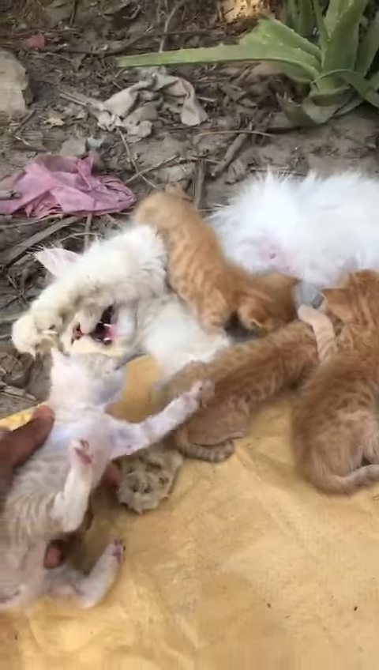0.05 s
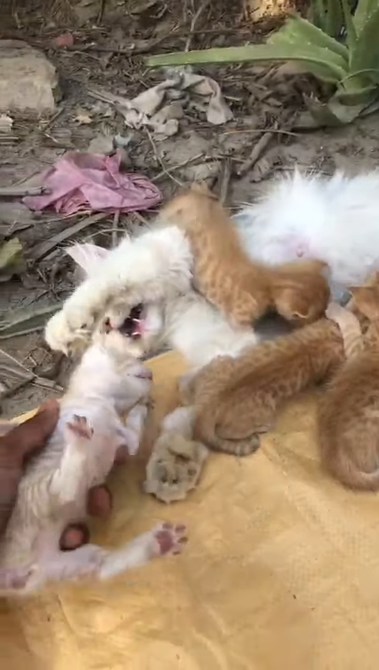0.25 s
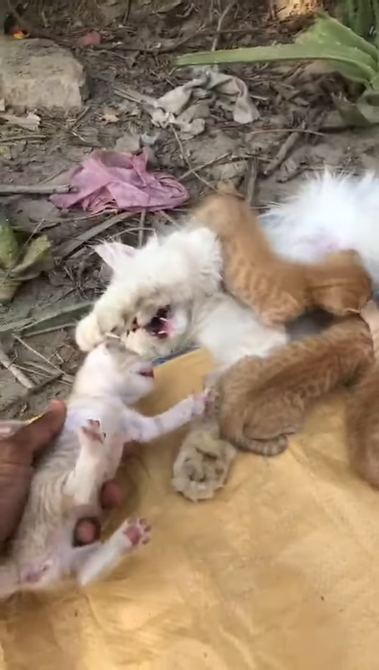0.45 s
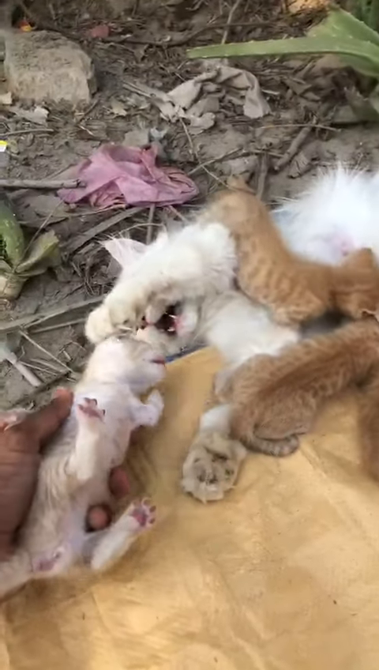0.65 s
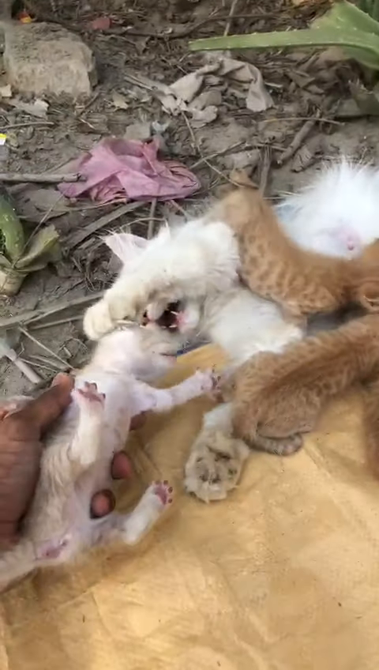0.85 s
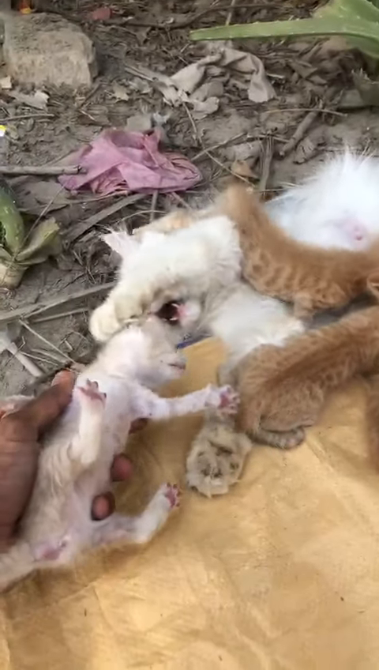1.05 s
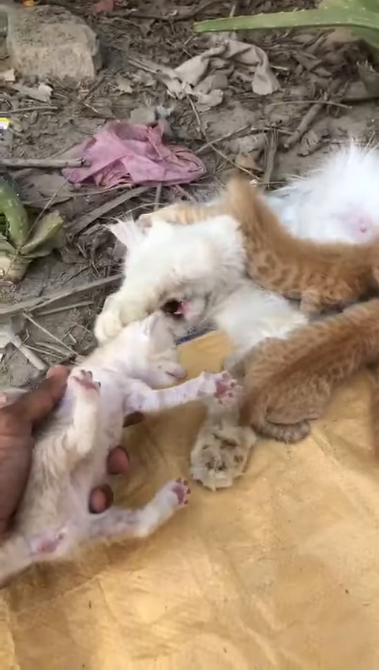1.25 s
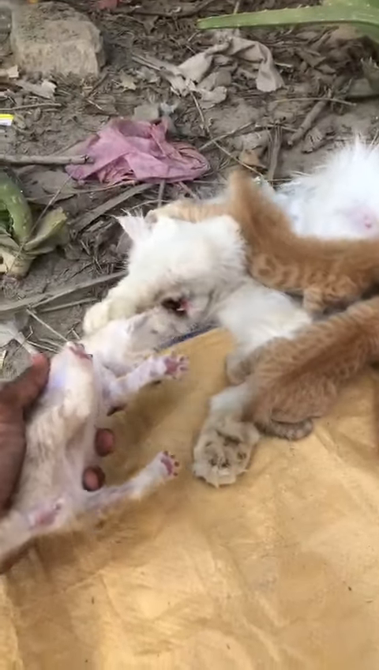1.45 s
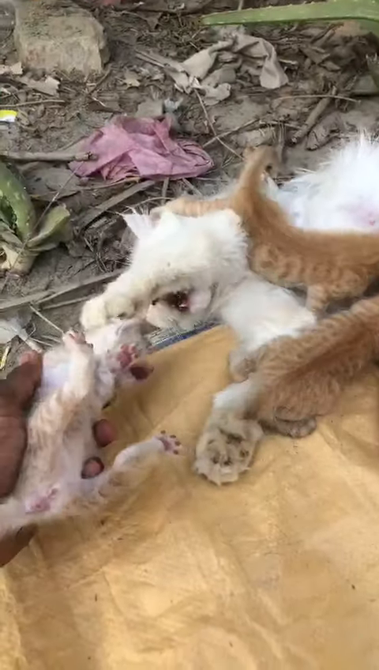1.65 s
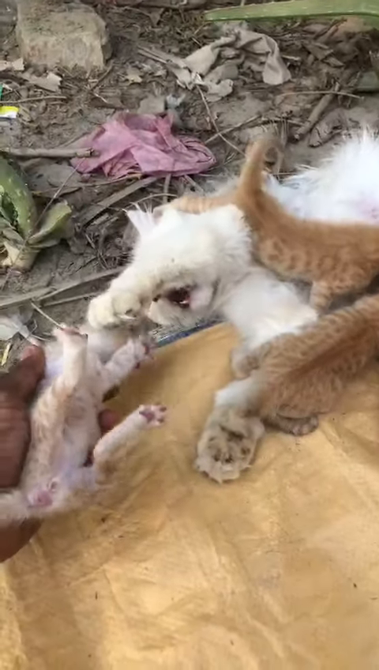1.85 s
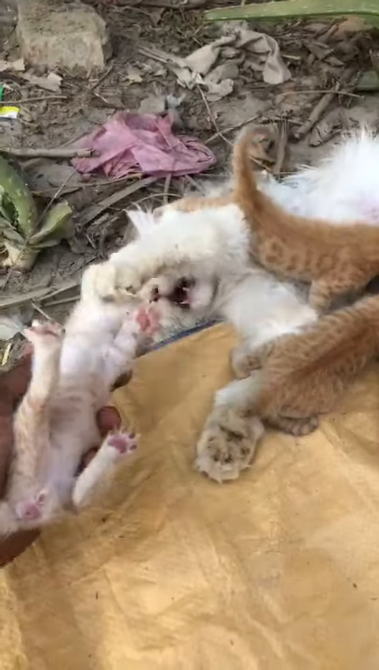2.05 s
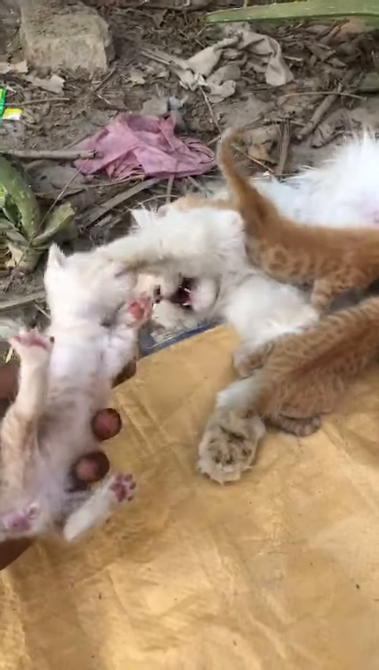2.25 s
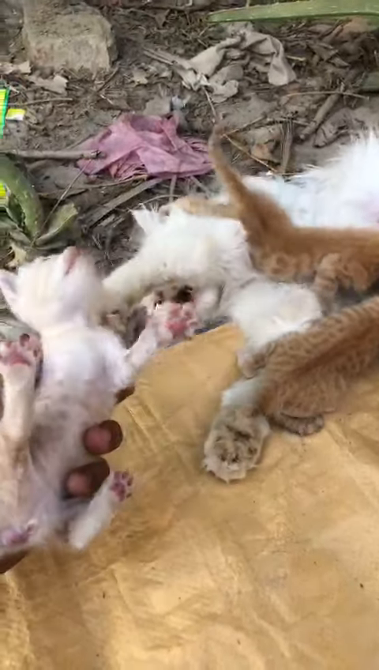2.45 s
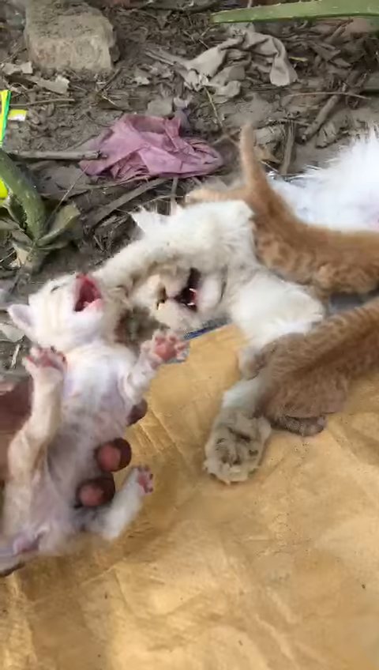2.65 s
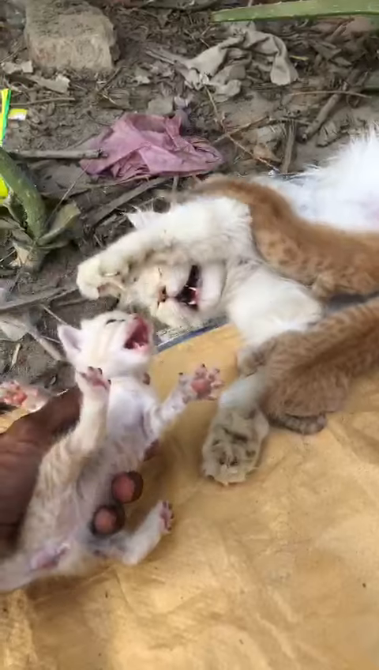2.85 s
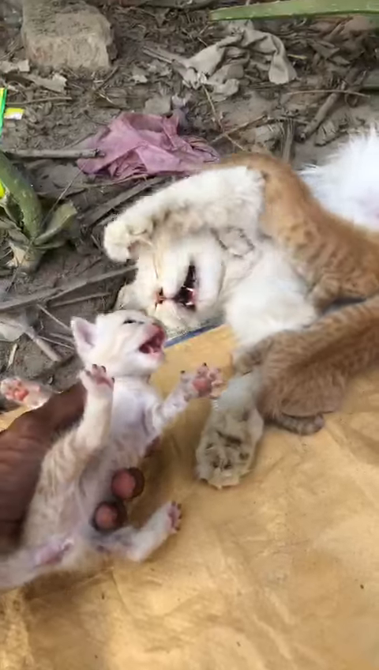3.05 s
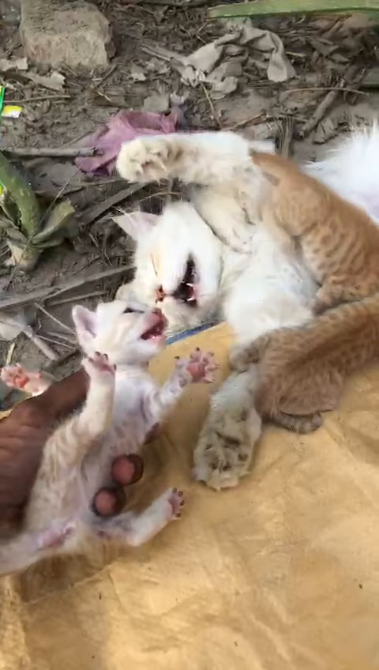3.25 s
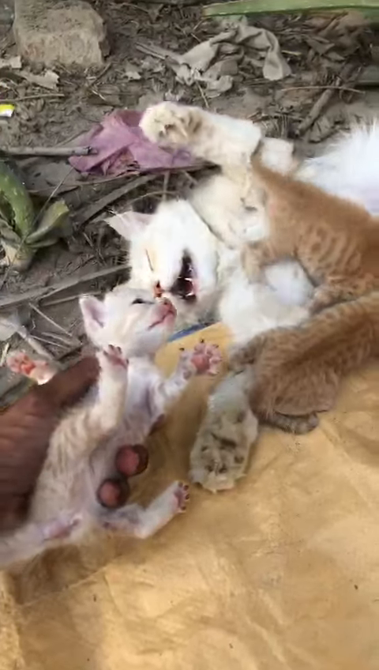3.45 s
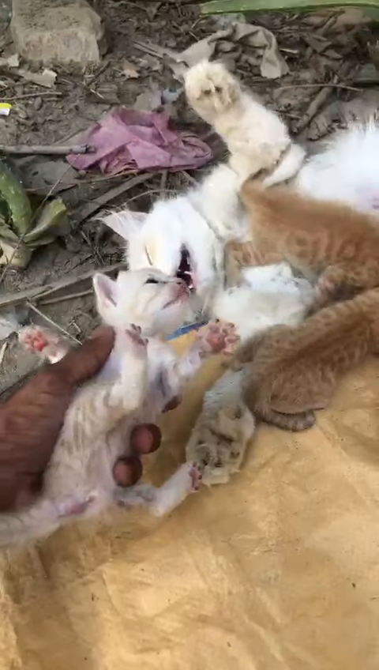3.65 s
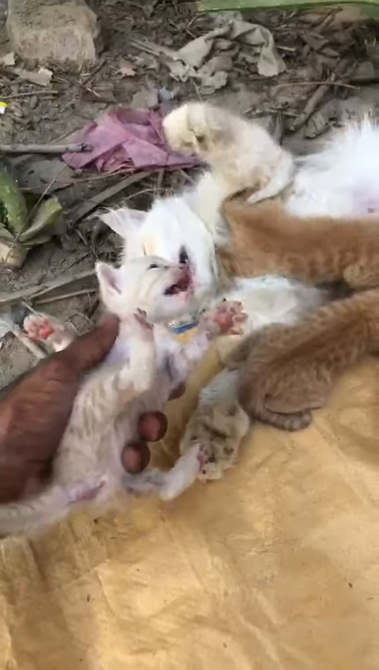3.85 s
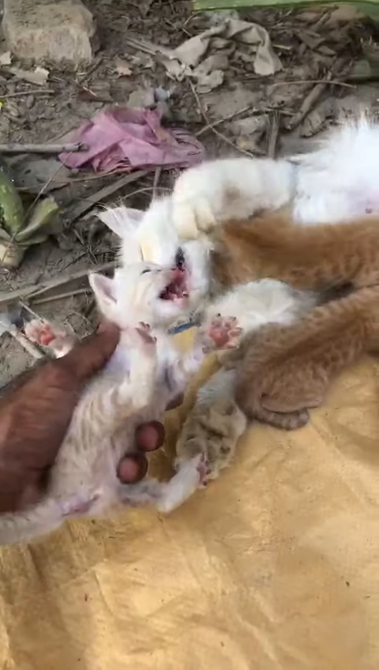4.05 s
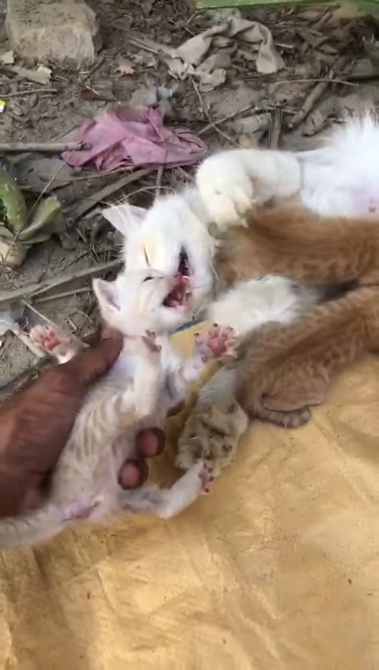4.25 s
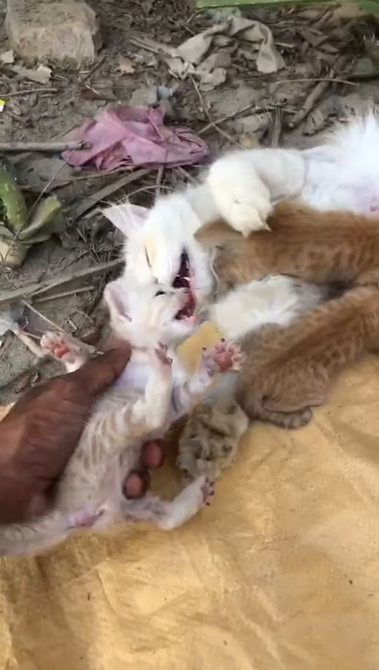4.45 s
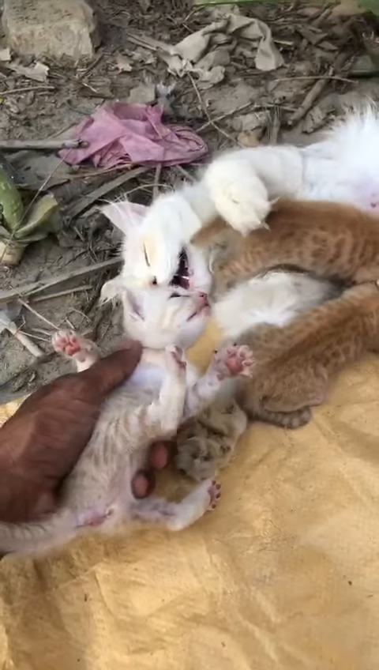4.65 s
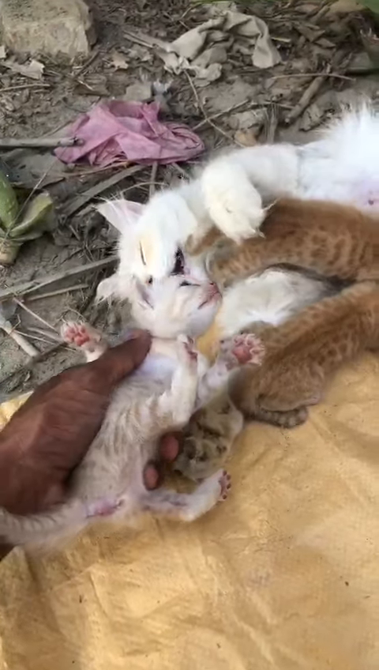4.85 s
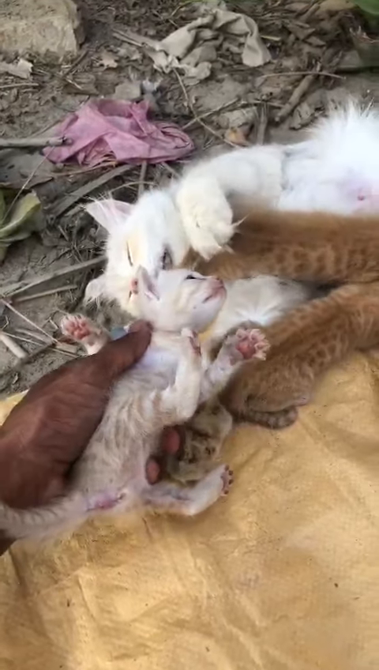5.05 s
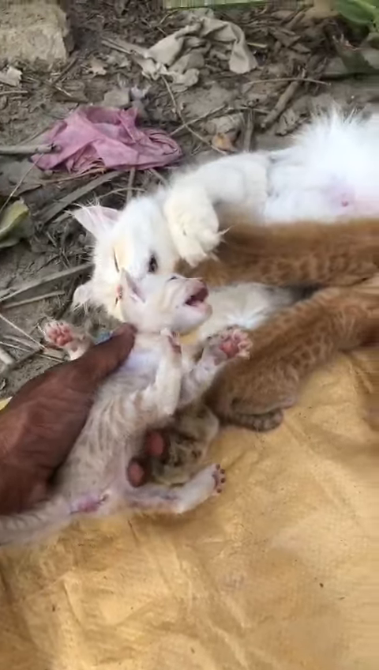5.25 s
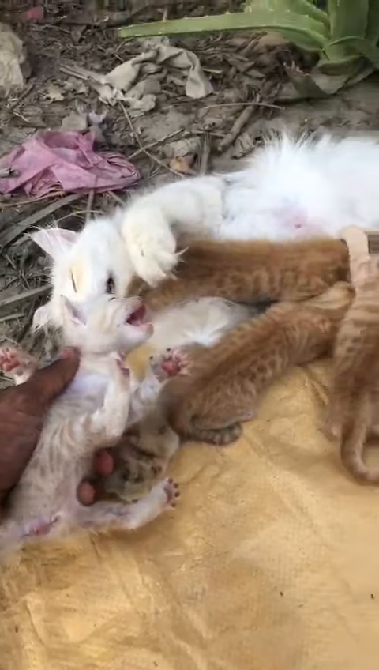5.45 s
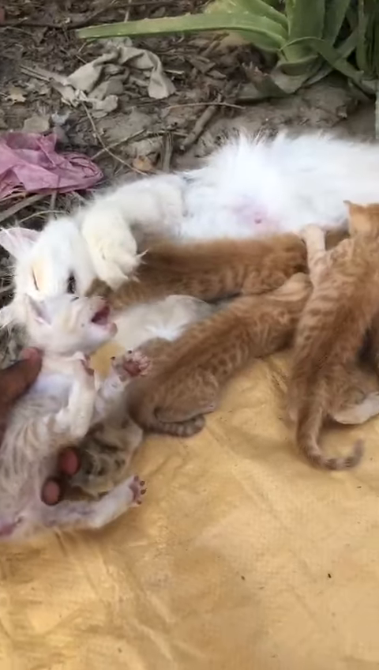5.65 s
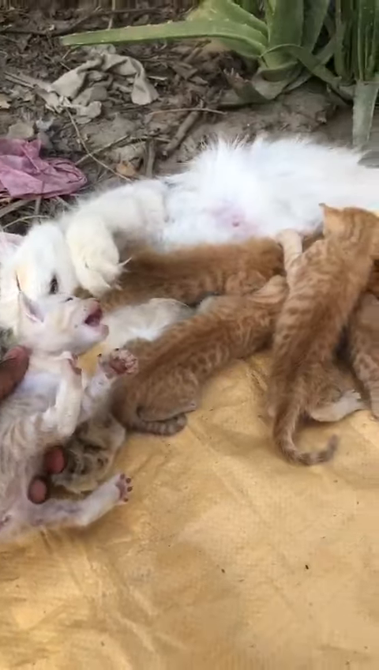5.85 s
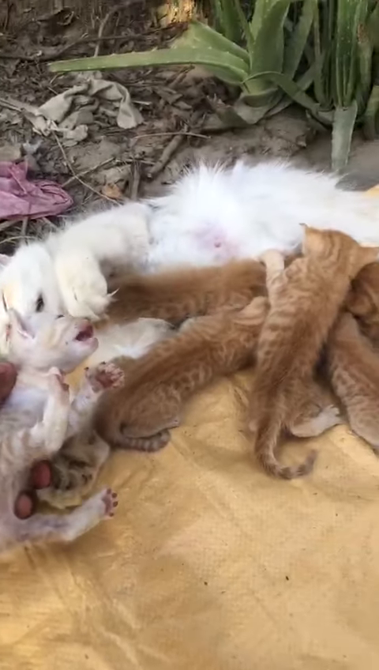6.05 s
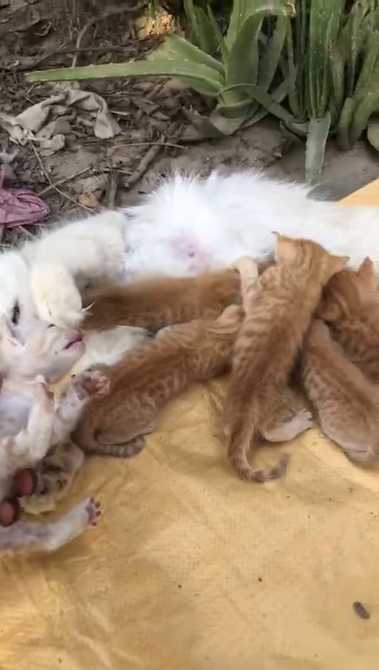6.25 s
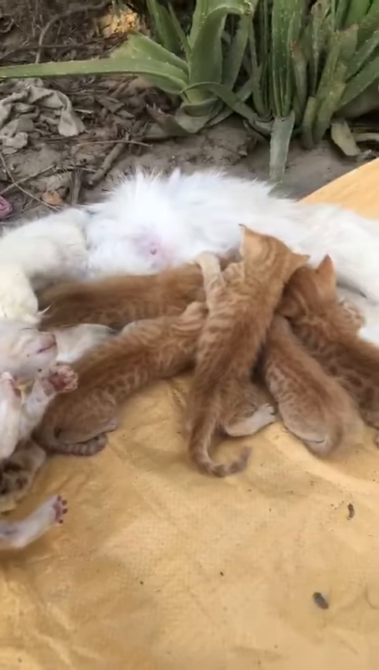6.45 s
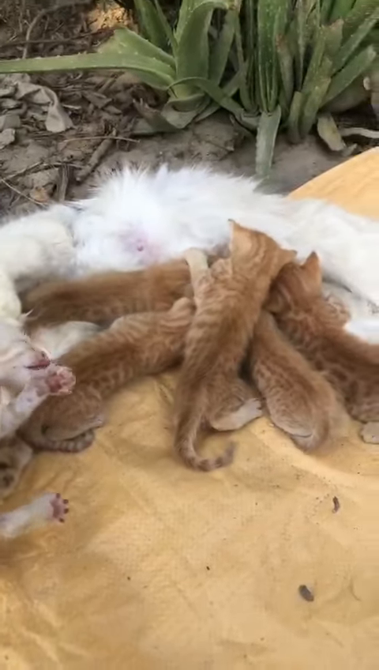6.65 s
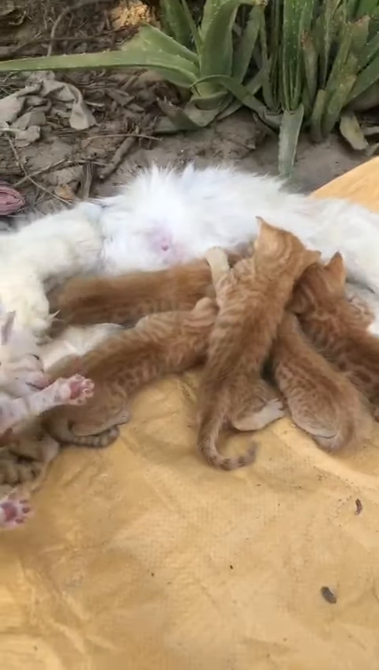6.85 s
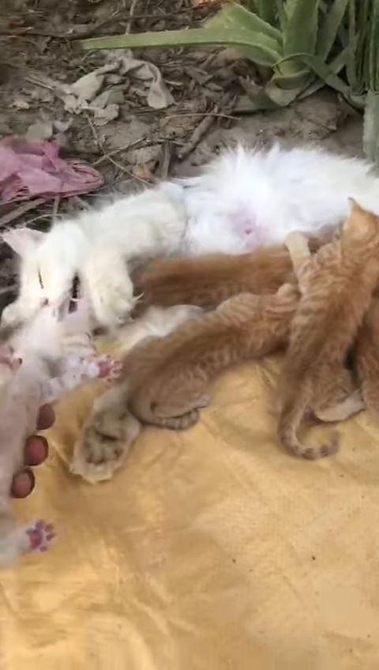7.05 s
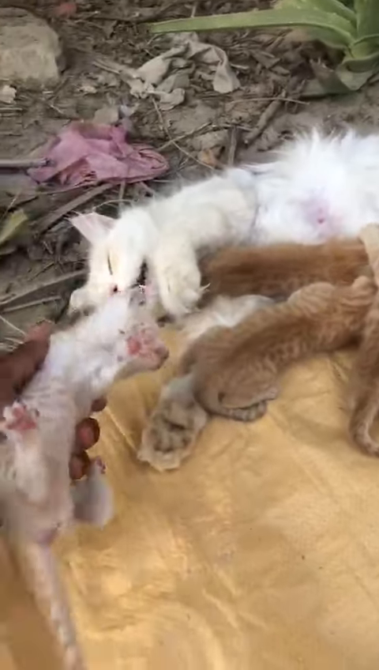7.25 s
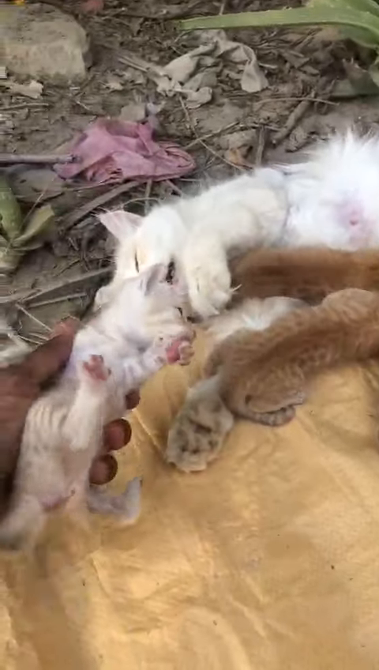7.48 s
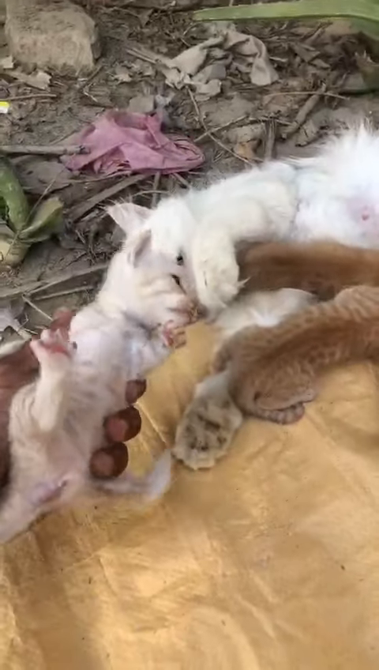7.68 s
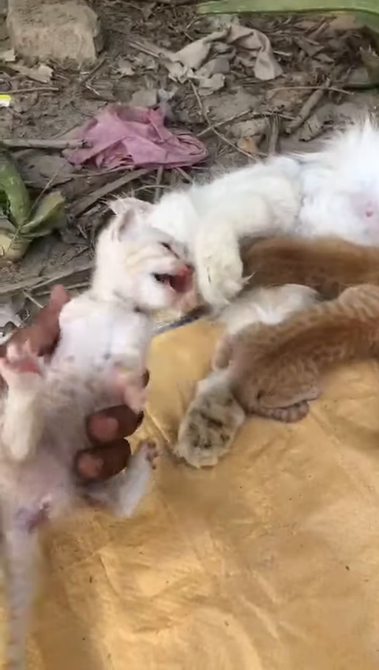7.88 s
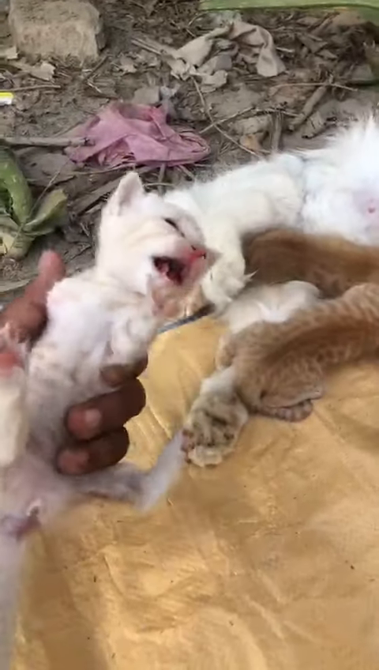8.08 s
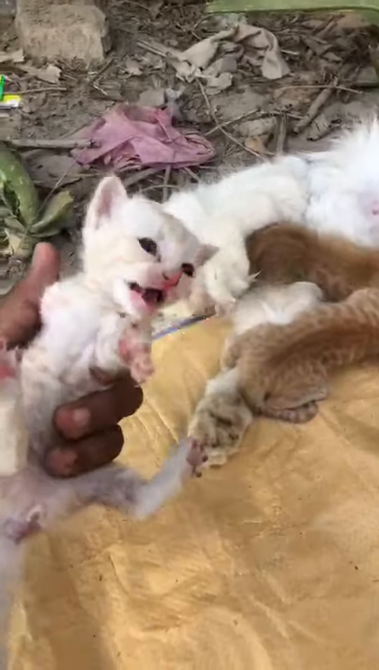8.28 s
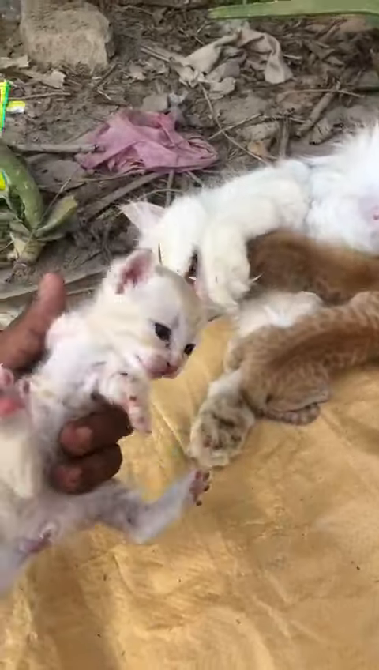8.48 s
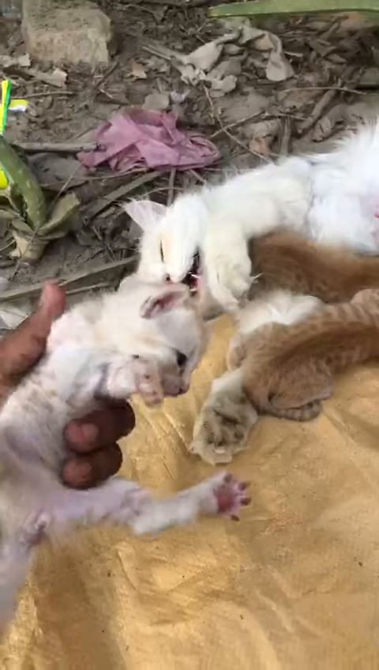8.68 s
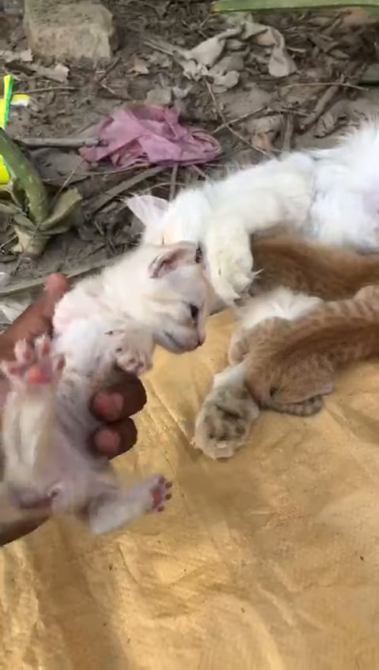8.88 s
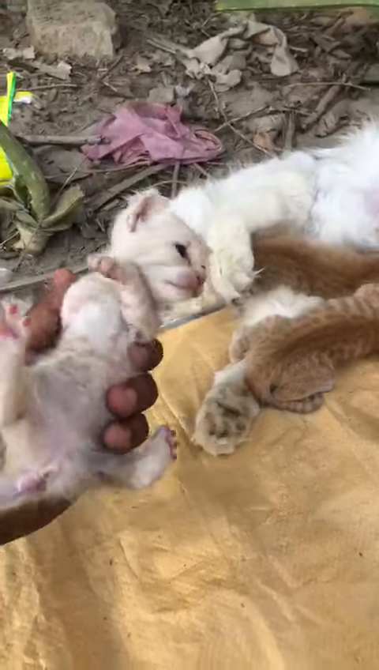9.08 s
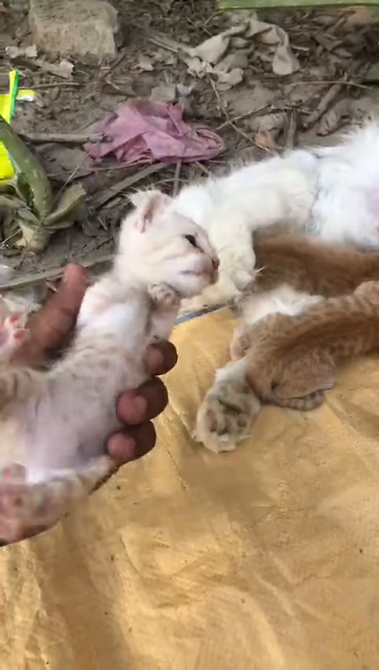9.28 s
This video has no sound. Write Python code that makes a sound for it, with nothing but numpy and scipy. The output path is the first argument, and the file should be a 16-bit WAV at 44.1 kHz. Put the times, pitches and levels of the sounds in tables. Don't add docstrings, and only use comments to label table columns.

```python
import sys
import numpy as np
from scipy import signal
from scipy.fft import rfft, irfft
from scipy.io import wavfile
from scipy.ndimage import uniform_filter1d

SR = 44100
rng = np.random.default_rng(int(sys.argv[2]) if len(sys.argv) > 2 else 0)


def inscribe(sig):
    pcm = np.round(np.clip(np.atleast_2d(sig).T, -1, 1) * 32767)
    wavfile.write(sys.argv[1], SR, pcm.astype(np.int16))


def gain_from_decibels(decibels):
    exponent = np.asarray(decibels, float) / 20
    return 10 ** exponent


N = 411012

# (t/s, f/Hz)
CRY_PITCH = [
    [(0.187, 797), (0.225, 990), (0.324, 1197), (0.397, 1289), (0.561, 1163), (0.591, 1216), (0.747, 1090),
     (0.829, 860), (0.843, 740)],
    [(1.527, 770), (1.599, 1080), (1.653, 1169), (1.695, 1192), (1.733, 1080), (1.881, 1145), (2.15, 1061),
     (2.185, 960), (2.199, 744)],
    [(2.512, 943), (2.649, 1167), (2.76, 1209), (3.091, 1160), (3.143, 1136), (3.268, 1108), (3.344, 1056),
     (3.375, 902), (3.389, 795)],
    [(3.882, 891), (3.932, 1120), (4.003, 1163), (4.316, 1162), (4.416, 1162), (4.539, 1104), (4.567, 1050),
     (4.598, 937), (4.611, 794)],
    [(5.2, 872), (5.242, 969), (5.265, 1095), (5.312, 1148), (5.713, 1177), (6.062, 1053), (6.216, 964),
     (6.275, 887), (6.336, 667)],
    [(7.8, 810), (7.852, 1082), (7.969, 1129), (8.01, 1173), (8.165, 1118), (8.374, 1102), (8.481, 991),
     (8.547, 811), (8.567, 700)],
]
# (t/s, f/Hz, level/dB)
MATE_MEW = [
    (5.932, 1010, -50),
    (5.958, 916, -51),
    (6.12, 1091, -45.5),
    (6.184, 1128, -46),
    (6.302, 1135, -43.5),
    (6.454, 1015, -45.5),
    (6.514, 996, -48),
    (6.527, 1123, -54),
]


def evened(x):
    return x / np.sqrt(np.mean(abs(x) ** 2) + 1e-20)


def read(points, hz):
    f, value = np.transpose(points)
    return np.interp(np.log(hz + 1), np.log(f + 1), value)


def add(mix, s, sound):
    part = mix[round(s * SR):][:len(sound)]
    part += sound[:len(part)]


def fuzz(count, width_hz):
    r = np.exp(-np.pi * width_hz / SR)
    z = rng.standard_normal(count + 500) + 1j * rng.standard_normal(count + 500)
    return evened(signal.lfilter([1], [1, -2 * r, r * r], z)[500:])


def band(count, hz, width_hz):
    carrier = np.exp(2j * np.pi * hz * np.arange(count) / SR)
    return np.sqrt(2) * (fuzz(count, width_hz) * carrier).real


def gate(t, start, end, edge):
    return np.clip(np.minimum(t - start, end - t) / edge + .5, 0, 1)


def cry(pitch, effort, mouth, hum_db, tilt_db, colour, lips_s):
    # (f/Hz, level/dB)
    upper_colour = [(4000, 11), (5500, 9), (6700, 7), (8000, -6), (9500, -10.5), (11000, -16.5),
                    (12500, -30.5)]
    # (start/s, end/s, cycles in the pattern, line level/dB, disorder level/dB)
    breaks = [(.328, .336, 6, -7, -16), (1.59, 1.7, 3, -44, -29), (1.69, 1.72, 3, -40, -25),
              (1.7025, 1.7065, 4, -20, -8), (1.707, 1.72, 4, -34, -22), (1.738, 1.84, 2, -44, -36),
              (2.826, 2.848, 4, -30, -24), (2.847, 2.892, 4, -13, -10), (2.878, 2.925, 3, -15, -12),
              (2.92, 3.0, 3, -12, -19), (3.0, 3.1, 3, -27, -30), (3.011, 3.027, 3, -12, -18),
              (3.033, 3.044, 3, -14, -18), (3.058, 3.075, 3, -12, -18), (3.081, 3.091, 3, -12, -16),
              (3.1, 3.19, 4, -30, -41), (3.148, 3.158, 3, -22, -19), (4.018, 4.056, 4, -10, -8),
              (4.052, 4.082, 2, -13, -8), (4.078, 4.234, 3, -7.5, -22), (4.078, 4.125, 3, -40, -16),
              (4.23, 4.284, 3, -12, -12), (4.287, 4.36, 4, -30, -27), (5.4, 5.437, 3, -40, -24),
              (5.436, 5.454, 4, -14, -8), (5.452, 5.532, 3, -7.5, -21), (5.528, 5.563, 3, -9, -14),
              (5.563, 5.655, 5, -30, -25), (7.93, 8.0, 3, -50, -24), (8.061, 8.068, 6, -34, -20),
              (8.098, 8.11, 6, -32, -20), (8.124, 8.136, 6, -36, -24), (8.165, 8.235, 3, -44, -32),
              (8.26, 8.34, 3, -44, -31), (8.36, 8.47, 3, -50, -25), (8.405, 8.44, 3, -50, -23),
              (8.465, 8.545, 3, -50, -18), (5.92, 6.02, 3, -40, -22)]
    # (f/Hz, level/dB)
    broken_colour = [(1400, -7), (2000, -1), (3200, -1), (4300, 6), (4900, 0), (5500, 5.5), (7500, 14),
                     (11500, 8.5)]
    # (t/s, step/Hz, relaxing time/s)
    slips = [(0.35, -95.5, 0.049), (0.377, 73, 0.015), (0.664, -24, 0.0042), (1.785, -12, 0.033),
             (2.049, -18, 0.069), (2.847, -48, 0.014), (3.206, 31, 0.11), (4.019, -32.5, 0.033),
             (4.231, 27.5, 0.057), (4.287, 32, 0.085), (5.432, -32, 0.091), (7.912, 80, 0.033),
             (7.928, 30, 0.009), (7.94, -19, .015), (8.098, -77.5, 0.0089), (8.128, -53, 0.007),
             (.48, 15.5, 0.045), (.675, 29, .012), (2.884, 35, 0.0073), (3.0, 16, 0.017),
             (4.247, -25, .006), (5.452, 28, 0.0072), (5.557, 22, 0.015)]
    # (t/s, half length/s, level/dB)
    swells = [
        (.343, 0.0078, 7.5),
        (0.386, 0.018, 8.5),
        (7.855, 0.027, 5.5),
        (5.68, 0.14, 2.5),
        (6.8, 0.017, 14),
    ]
    slip_s, shut_lead_s, ring_db = .016, .016, 2
    lips_part_s, veil_db = .033, -13
    brightening_db = 2.5
    above_db, far_db = -16.5, -14

    s = np.transpose(pitch)[0]
    start_s, end_s = s[0], s[-1]
    t = np.arange(start_s, end_s, 1 / SR)
    curves = (np.interp(t, *np.transpose(c)) for c in (pitch, effort, mouth))
    hz, effort_db, mouth_hz = (uniform_filter1d(c, size=350) for c in curves)
    hum_db = np.interp(t, [start_s, (start_s + end_s) / 2, end_s], hum_db)
    parted = gate(t, start_s + lips_part_s, np.inf, 0.076) + 0.027
    lower, upper_db = partial_levels(parted, hz, effort_db, mouth_hz, hum_db, *colour)

    hz = uniform_filter1d(hz, size=600)
    hz = hz + sum(step_hz * gate(t, at, np.inf, slip_s) * np.exp(-np.maximum(t - at, 0) / relax_s)
                  for at, step_hz, relax_s in slips)
    phase = 2 * np.pi * np.cumsum(hz * (1 + .003 * fuzz(len(t), 60).real)) / SR

    tilt_db = tilt_db - 0.072 * (upper_db + 40.5)
    tilt_db = tilt_db - 0.015 * np.maximum(1090 - hz, 0)
    tilt_db = tilt_db + brightening_db * ((t - start_s) / (end_s - start_s) - .5)
    k = np.arange(5, 15)[:, None]
    upper = gain_from_decibels(read(upper_colour, k * hz) + tilt_db * (k - 5)) * (k * hz < 13000)
    upper *= gain_from_decibels(upper_db + tongue_db(t, k, hz)) / np.sqrt((upper ** 2).sum(0))
    shimmer = 1 + np.minimum(.1 * k - .15, .7) * np.array([fuzz(len(t), 14) for _ in k])
    open_mouth = gain_from_decibels(veil_db * (1 - gate(t, lips_s, np.inf, .012)))
    upper = 0.96 * upper * open_mouth
    lower = lower * np.array([np.ones_like(t), np.ones_like(t), open_mouth])
    overtones = (upper * shimmer * np.exp(1j * k * (phase + 0.73 * k))).sum(0)
    overtones += sum(gain * np.exp(1j * n * phase) for n, gain in enumerate(lower, 2))

    uneven = gain_from_decibels(-42.0) * fuzz(len(t), 690)
    disorder, drift = fuzz(len(t), 1400), fuzz(len(t), 120)
    flutter = gain_from_decibels(3 * fuzz(len(t), 60).real)
    for start, end, cycles, below_db, disorder_db in breaks:
        pattern = np.exp(1j * phase / cycles)
        lines = gain_from_decibels(below_db) / pattern
        lines = lines + gain_from_decibels(below_db + above_db) * pattern
        lines = lines + gain_from_decibels(below_db + far_db) / pattern ** 2
        lines = lines * (1 + 2.4 * gain_from_decibels(disorder_db) * drift)
        uneven = uneven + gate(t, start, end, .005) * flutter * (lines + .45 * gain_from_decibels(disorder_db) * disorder)
    between = rfft((overtones * uneven).real)
    between = irfft(between * gain_from_decibels(read(broken_colour, np.fft.rfftfreq(len(t), 1 / SR))), len(t))

    shut = gate(t, end_s - shut_lead_s, np.inf, .004)
    swell_db = sum(db * np.exp(-((t - at) / half_s) ** 2) for at, half_s, db in swells)
    hum_db = hum_db + ring_db * shut + swell_db
    hum = gain_from_decibels(hum_db + 2.1 * fuzz(len(t), 13.0).real) * np.exp(1j * phase)
    voice = hum.real + (overtones.real + between) * (1 - shut)
    return np.sqrt(2) * voice * gate(t, start_s + 0.0061, end_s - .005, 0.011)


def partial_levels(lips, hz, effort_db, mouth_hz, hum_db, pressed_db, second_db, soft_db, leak_db):
    outside_db = [-6.5, -0.9]
    mouth_width_hz, skirt_below_db, skirt_above_db = 324, 19.5, 24
    soft_share, open_db_per_khz = 0.27, 11.5
    off_hz = np.arange(2, 5)[:, None] * hz - mouth_hz
    slope_db = np.where(off_hz < 0, skirt_below_db, skirt_above_db)
    skirt_db = slope_db * np.log10(1 + (off_hz / mouth_width_hz) ** 2)
    pressed_db = pressed_db + effort_db + 35 + open_db_per_khz * (mouth_hz - 3400) / 1000
    hum_db = hum_db + soft_share * (effort_db + 35)
    base_db = [hum_db + second_db] + [pressed_db + leak_db + db for db in outside_db]
    lower = np.hypot(gain_from_decibels(effort_db - skirt_db), gain_from_decibels(np.array(base_db)))
    upper = np.hypot(gain_from_decibels(pressed_db), gain_from_decibels(hum_db + soft_db) * lips)
    return lower, 20 * np.log10(upper)


def tongue_db(t, k, hz):
    # (t/s, peak f/Hz, level/dB, tilt/dB per partial, hollow f/Hz)
    tongue = [(0.25, 6350, -9.3, 0, 5900), (.33, 7000, -10, 2.5, 6000), (0.466, 7650, -1, 0, 7040),
              (0.511, 7000, -4, -0.2, 7800), (0.594, 10200, 1.5, -0.2, 10840),
              (0.775, 7000, 0.5, 0.2, 7980), (0.82, 6400, -11, 5, 7310), (1.54, 10210, 19, 1, 7460),
              (1.631, 5230, -8.5, -2, 11500), (1.722, 7100, 1.5, 0.6, 8600), (1.969, 8200, -9, 1, 8700),
              (2.042, 10900, 5, -1.1, 7900), (2.18, 8450, -5.5, 2.2, 6410), (2.53, 8200, -4.5, 4.5, 9900),
              (2.75, 5900, -8.5, -1.2, 10000), (2.858, 6400, -0.5, -0.5, 10000),
              (2.909, 5600, -7.5, 1.5, 8750), (3.203, 6840, -8, 1.2, 9900), (3.37, 10960, -6.5, 1, 9660),
              (3.89, 6560, 2.5, 5, 9920), (4.049, 5730, -6.5, 3, 8590), (4.22, 6340, -4.5, 2, 9120),
              (4.328, 6040, -1, 0, 10080), (4.358, 6540, -1, -1, 6850), (4.59, 7600, -3.5, 1.5, 5660),
              (5.22, 6300, 4.5, -1, 6300), (5.383, 7880, 2.2, -1, 8600), (5.653, 6970, 0.5, -1.8, 6950),
              (5.892, 6230, 0.5, -2.5, 6670), (5.988, 6400, -4, -1.5, 6100), (6.31, 7130, -4, 3.5, 6400),
              (7.84, 7600, -7.5, 1.5, 4700), (8.064, 7600, -6.5, 1.3, 9100), (8.095, 9380, -12, 1.5, 8600),
              (8.159, 8000, -1.5, 0.9, 8370), (8.4, 7800, 0, -0.1, 7800), (8.54, 7230, 2, -0.6, 7200)]
    s, *controls = np.transpose(tongue)
    peak_hz, level_db, tilt_db, hollow_hz = (np.interp(t, s, c) for c in controls)
    peak = 8 / (1 + ((k * hz - peak_hz) / 330) ** 2)
    hollow = 8 / (1 + ((k * hz - hollow_hz) / 380) ** 2)
    top = -6 * np.maximum(k - 10, 0)
    return level_db + tilt_db * np.minimum(k - 5, 5) + top + peak - hollow


def puffs(rows):
    out = np.zeros(N)
    for s, length_s, hz, width_hz, db in rows:
        count = round(length_s * SR)
        add(out, s, gain_from_decibels(db) * band(count, hz, width_hz) * signal.windows.tukey(count, .7))
    return out


def throat_shuts():
    # (lead before the end/s, length/s, share of the hiss f, width/Hz, level/dB)
    parts = [
        (0.024, 0.05, 0.9, 1400, -63),
        (.018, 0.014, .28, 1300, -52),
        (0.014, .018, 0.1, 240, -55),
    ]
    # (level/dB, hiss f/Hz)
    each_cry = [(-3, 7000), (-2, 10500), (2.5, 7700), (2, 7700), (-2.5, 8300), (2, 7200)]
    rows = []
    for pitch, (more_db, hiss_hz) in zip(CRY_PITCH, each_cry):
        for lead_s, length_s, share, width_hz, db in parts:
            rows.append((pitch[-1][0] - lead_s, length_s, share * hiss_hz, width_hz, db + more_db))
    return puffs(rows)


def mate():
    overtones_db = [-26, -32, -38]
    s, hz, db = np.transpose(MATE_MEW)
    t = np.arange(s[0], s[-1], 1 / SR)
    phase = 2 * np.pi * np.cumsum(np.interp(t, s, hz)) / SR
    tone = np.sin(phase) + sum(gain_from_decibels(d) * np.sin(n * phase) for n, d in enumerate(overtones_db, 2))
    return np.sqrt(2) * gain_from_decibels(np.interp(t, s, db)) * tone * gate(t, s[0] + 0.0032, s[-1] - .003, 0.0054)


def short_notes():
    # (start/s, length/s, first f/Hz, last f/Hz, level/dB)
    glides = [(3.561, .026, 590, 480, -36), (3.582, .022, 430, 370, -38), (8.65, .03, 3060, 3030, -59),
              (8.668, .085, 3035, 3025, -53), (8.74, .04, 3030, 3025, -61), (8.775, .04, 3030, 3020, -66),
              (8.85, .035, 3040, 3030, -70), (8.655, .025, 6130, 6070, -69), (8.672, .065, 6070, 6070, -66),
              (9.108, .024, 1760, 1740, -62), (9.112, .03, 2330, 2560, -61), (9.108, .02, 2760, 2980, -66),
              (9.148, .022, 1050, 1000, -59), (9.155, .12, 3050, 3050, -66), (4.825, .035, 4300, 4300, -70),
              (6.51, .06, 4250, 4200, -72), (8.715, .06, 2400, 2390, -56), (9.12, .03, 1250, 1240, -50),
              (9.16, .045, 270, 280, -53), (9.215, .065, 265, 280, -51), (1.258, .04, 780, 710, -57),
              (1.288, .014, 700, 480, -54), (7.9, .3, 940, 930, -61), (5.82, .3, 1410, 1380, -67),
              (2.33, .19, 1050, 1000, -65), (2.2, .1, 2720, 2680, -71), (2.375, .06, 2900, 2880, -70),
              (1.74, .09, 3830, 3890, -51), (2.6, .08, 880, 870, -62), (.35, .3, 370, 330, -64),
              (.2, .2, 600, 550, -65)]
    out = np.zeros(N)
    for s, length_s, first_hz, last_hz, db in glides:
        count = round(length_s * SR)
        phase = 2 * np.pi * np.cumsum(np.linspace(first_hz, last_hz, count)) / SR
        waver = 1.5 + .45 * (db < -45) * fuzz(count, 90)
        tone = (np.exp(1j * phase) * waver).imag
        swell = signal.windows.tukey(count, .8) * np.geomspace(1.3, .45, count)
        add(out, s, gain_from_decibels(db) * np.sqrt(2) * tone * swell)
    return out


def rustles():
    # (start/s, length/s, centre f/Hz, width/Hz, level/dB)
    rubs = [(3.878, .015, 1500, 900, -55), (6.52, .012, 1200, 700, -58), (2.3, .07, 6500, 5000, -64),
            (3.6, .08, 5000, 7000, -62), (3.625, .045, 400, 500, -54), (8.57, .11, 3500, 700, -63),
            (9.135, .016, 1200, 2500, -55), (9.11, .06, 6000, 5000, -64), (8.735, .035, 6500, 3000, -67),
            (8.925, .04, 5500, 1500, -69), (3.575, .1, 9000, 2500, -67), (4.98, .025, 6500, 1200, -70),
            (7.52, .08, 4500, 5000, -66), (3.565, .03, 1050, 200, -60), (9.11, .21, 400, 700, -56),
            (9.13, .19, 2900, 2200, -61), (3.883, .011, 8000, 6000, -56), (.685, .05, 6500, 6000, -63)]
    return puffs(rubs)


def dry_ticks():
    # (t/s, peak level/dB, ring f/Hz, cycles of ring)
    ticks = [(0.288, -33.5, 7000, 0.49), (.394, -34, 6000, 0.61), (.415, -50, 2000, .6),
             (0.69, -44, 4000, 1.2), (1.2162, -42, 5000, 0.6), (4.809, -44, 2300, 1.8),
             (4.8648, -42, 2540, 1.6), (4.9274, -41.5, 4840, 2.2), (5.072, -46, 9000, 1),
             (5.1167, -45, 2500, 0.88), (5.246, -38, 9500, 1.6), (6.3949, -46, 5110, 1.4),
             (6.7874, -47, 6060, .5), (6.975, -39.5, 7060, 0.66), (7.2849, -22.5, 1650, 1.35),
             (7.2893, -42, 4500, .4), (7.2975, -47, 5000, .6), (7.303, -48, 6000, .5),
             (7.3155, -48, 1400, 0.9), (3.8805, -49, 6800, 4), (7.2847, -33, 4200, .45),
             (7.288, -43, 1100, 1.5), (7.868, -46, 4000, 1.3), (7.957, -41, 1200, 0.8),
             (1.705, -34, 4200, 3), (9.0, -43, 9000, 0.76), (5.102, -51, 8500, .8),
             (5.1065, -46, 7500, 1.1), (1.548, -47, 9000, 1.3), (2.562, -48, 11000, 1.4),
             (8.5523, -34, 6500, .6), (8.555, -44, 6800, 1.3), (.373, -56, 7000, 1.1),
             (.418, -45, 7500, .8), (8.651, -52, 8500, 0.67), (6.478, -49, 7000, 0.57),
             (5.31, -46, 1200, 0.79)]
    out, u = np.zeros(N), np.arange(400) / SR
    for s, db, hz, cycles in ticks:
        decay = 2 * u * hz / cycles
        ring = np.sin(2 * np.pi * hz * u) * decay * np.exp(1 - decay)
        spark = rng.standard_normal(400) * np.exp(-u / .0007)
        add(out, s, gain_from_decibels(db) * (.8 * ring + .07 * spark))
    return out


def insect():
    # (start/s, end/s, level/dB)
    songs = [
        (0, 0.28, -77),
        (3.37, 3.736, -81),
        (6.367, 7.056, -77.5),
    ]
    t = np.arange(N) / SR
    level = sum(gain_from_decibels(db) * gate(t, start, end, .05) for start, end, db in songs)
    return level * band(N, 8680, 350)


def air():
    # (f/Hz, level/dB per Hz)
    wash_colour = [(24, -39.5), (40, -6.5), (134, -5), (292, -11), (336, -13), (683, -20.5), (1120, -22),
                   (1290, -22.5), (8580, -35.5), (11400, -39.5), (12500, -63.5), (22000, -120)]
    # (f/Hz, width/Hz, level/dB)
    engine = [
        (69, 25, -63),
        (135, 8.5, -63.5),
        (213, 14, -64.5),
    ]
    air_db = -53.5
    frames, hz = N // 256 + 5, np.fft.rfftfreq(1024, 1 / SR)
    a, b, patches = rng.standard_normal((frames, 513, 3)).T
    patches = uniform_filter1d(patches, size=40, axis=0)
    patches = evened(uniform_filter1d(patches, size=10, axis=1))
    gusts = evened(uniform_filter1d(rng.standard_normal(frames), size=12))
    gusts = gusts * np.clip(hz / 2000, 0, 1)[:, None]
    z = (a + 1j * b) * gain_from_decibels(read(wash_colour, hz)[:, None] + 1.2 * patches + 1.3 * gusts)
    wash = gain_from_decibels(air_db - 3.5) * evened(signal.istft(z, nperseg=1024, noverlap=768)[1][:N])
    return wash + sum(gain_from_decibels(db) * band(N, f, width_hz) for f, width_hz, db in engine)


def masked(x, under_db, up_db, down_db):
    z = signal.stft(x, nperseg=2048, noverlap=1536)[2]
    band_db = 10 * np.log10((abs(z[:1024]) ** 2).reshape(64, 16, -1).sum(1) + 1e-20)
    step = np.arange(64)[:, None]
    upward = np.maximum.accumulate(band_db + up_db * step) - up_db * step
    downward = np.maximum.accumulate((band_db - down_db * step)[::-1])[::-1] + down_db * step
    margin_db = band_db - np.maximum(upward, downward) + under_db
    keep = np.where(step > 6, np.clip(margin_db / 2 + .5, .02, 1), 1)
    z[:1024] *= np.repeat(keep, 16, axis=0)
    return signal.istft(z, nperseg=2048, noverlap=1536)[1][:N]


def scene():
    # (t/s, level at the mouth resonance/dB)
    efforts = [
        [(0.184, -60.5), (0.29, -57), (0.303, -37), (0.331, -32.5), (0.34, -87), (0.385, -50), (0.412, -32),
         (0.784, -37.5), (0.898, -89)],
        [(1.53, -58), (1.548, -66), (1.625, -38), (1.785, -19.5), (1.861, -25.5), (1.973, -22.5), (2.012, -29),
         (2.174, -34.5), (2.191, -86)],
        [(2.562, -66.5), (2.58, -48.5), (2.662, -31), (2.789, -20.5), (2.835, -22.5), (2.925, -18.5),
         (3.298, -29.5), (3.365, -36), (3.381, -53)],
        [(3.886, -54.5), (3.936, -35.5), (4.072, -21.5), (4.22, -20.5), (4.233, -22.5), (4.393, -29.5),
         (4.436, -27), (4.539, -30.5), (4.612, -42)],
        [(5.184, -61), (5.249, -61.5), (5.259, -42.5), (5.444, -27.5), (5.733, -31), (5.992, -36.5),
         (6.069, -33), (6.273, -42), (6.332, -66)],
        [(7.797, -55.5), (7.879, -57.5), (7.919, -39.5), (8.139, -18.5), (8.209, -19), (8.282, -23),
         (8.378, -19), (8.554, -36), (8.558, -63)],
    ]
    # (t/s, f/Hz)
    mouths = [
        [(0.199, 2818), (0.258, 2233), (0.375, 3290), (0.416, 2800), (0.713, 1550), (0.819, 1222)],
        [(1.531, 2738), (1.564, 4730), (1.709, 3780), (1.728, 4460), (1.876, 3370), (2.011, 3350),
         (2.048, 2960), (2.199, 2390)],
        [(2.503, 2800), (2.689, 4440), (2.743, 4396), (2.848, 4047), (3.074, 3735), (3.295, 2880),
         (3.331, 2710), (3.363, 2570)],
        [(3.845, 2364), (3.94, 4170), (4.05, 4270), (4.194, 4130), (4.274, 3930), (4.296, 3960), (4.442, 3310),
         (4.611, 2420)],
        [(5.186, 2030), (5.309, 4740), (5.416, 4490), (5.694, 4160), (5.979, 3470), (5.999, 3040),
         (6.119, 2580), (6.266, 2230)],
        [(7.79, 2670), (7.938, 3440), (8.108, 3330), (8.21, 3100), (8.288, 3450), (8.303, 3164), (8.448, 2270),
         (8.489, 2540)],
    ]
    # (fundamental level/dB at start, middle, end, upper tilt/dB per partial)
    hums = [(-56.5, -53, -53, 2), (-54, -50.5, -54, 2.5), (-50.5, -49.5, -52.5, 1),
            (-53.5, -49.5, -55, -0.06), (-57.5, -58, -66, 3), (-50.5, -44, -44, 2.5)]
    # (pressed upper/dB, soft 2nd over hum/dB, soft upper over hum/dB, leak past the mouth/dB)
    colours = [(-53.5, 3, -8.5, -10), (-54, 1.5, -10, 5.5), (-67, 2, -0.5, -4.5), (-61.5, 3.5, -7.5, -7),
               (-67.5, 10.5, 2, 9), (-43.5, 4.5, -23.5, -1.5)]
    lips = [.29, 1.55, 2.555, 3.897, 5.259, 7.882]
    voices = np.zeros(N)
    for pitch, effort, mouth, hum, colour, lips_s in zip(CRY_PITCH, efforts, mouths, hums, colours, lips):
        *hum_db, tilt_db = hum
        add(voices, pitch[0][0], cry(pitch, effort, mouth, hum_db, tilt_db, colour, lips_s))
    add(voices, MATE_MEW[0][0], mate())
    small = throat_shuts() + short_notes() + rustles() + dry_ticks() + insect()
    return (voices + small + air())[None]


def band_limit(x):
    return signal.sosfilt(signal.butter(12, 12640, fs=SR, output="sos"), x)


def record(dry):
    cut = signal.lfilter(*signal.butter(4, 43, "highpass", fs=SR), dry[0])
    cut = masked(cut, under_db=32, up_db=2.9, down_db=8.0)
    edge = signal.firwin(511, 12480, window=("kaiser", 9), fs=SR)
    limited = signal.oaconvolve(cut, edge, "same")
    return band_limit(limited[None])


dry = scene()
out = record(dry)
inscribe(out)
```